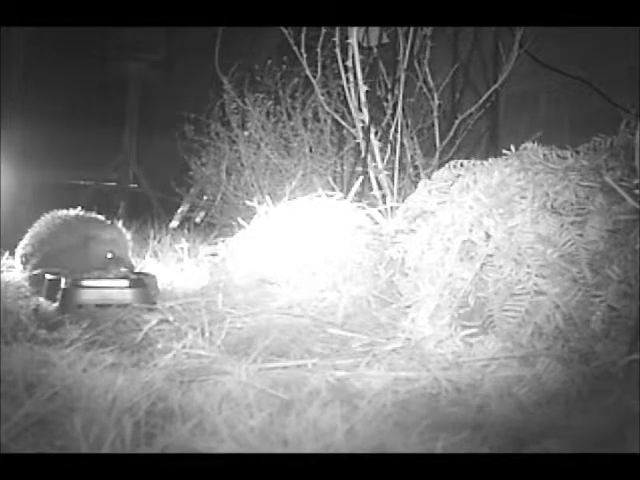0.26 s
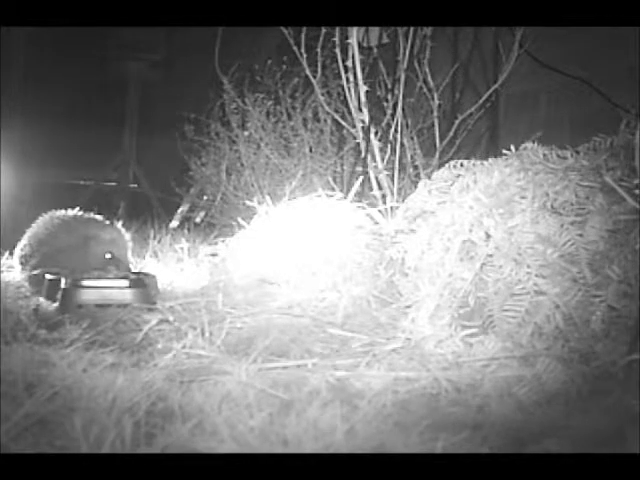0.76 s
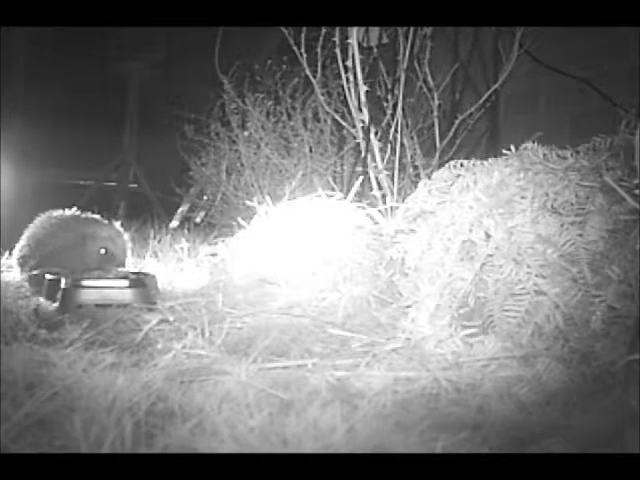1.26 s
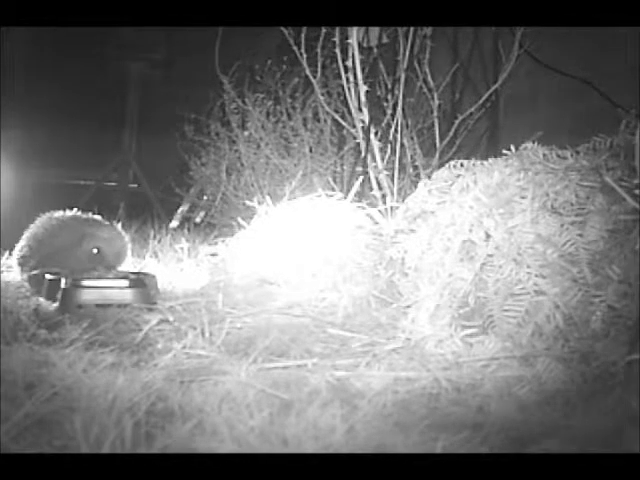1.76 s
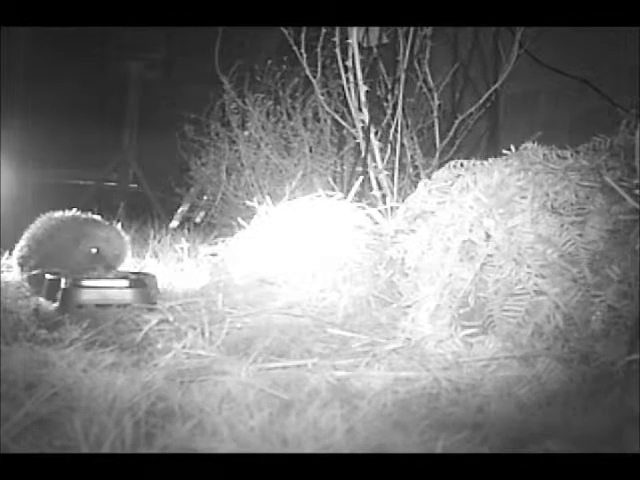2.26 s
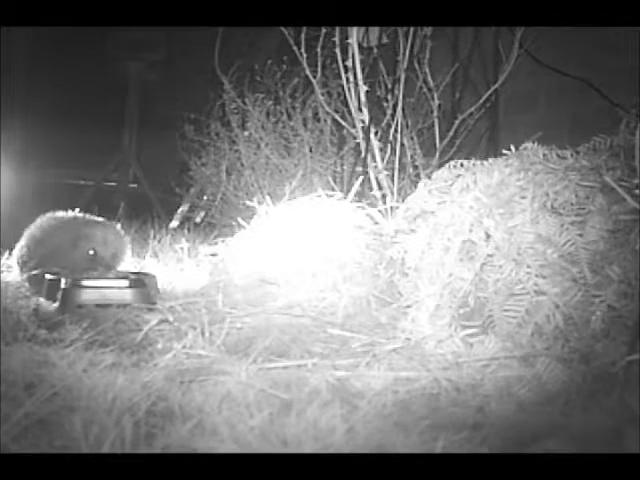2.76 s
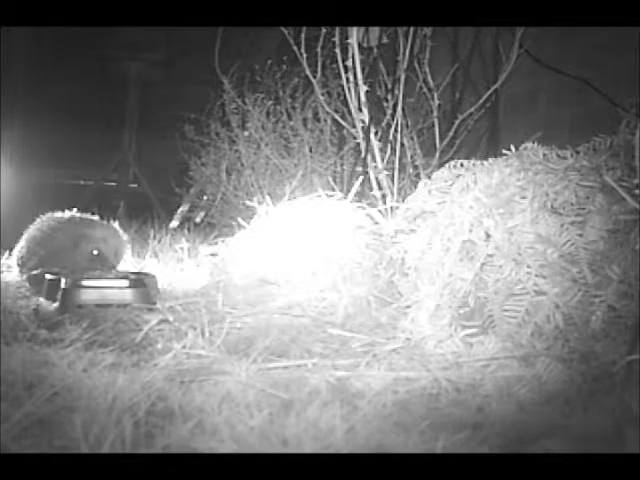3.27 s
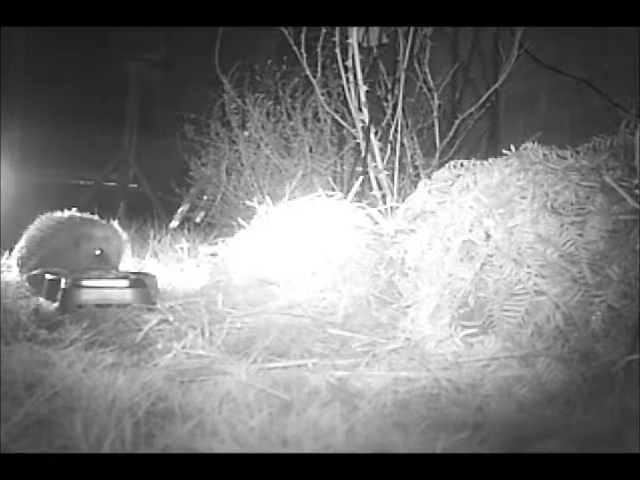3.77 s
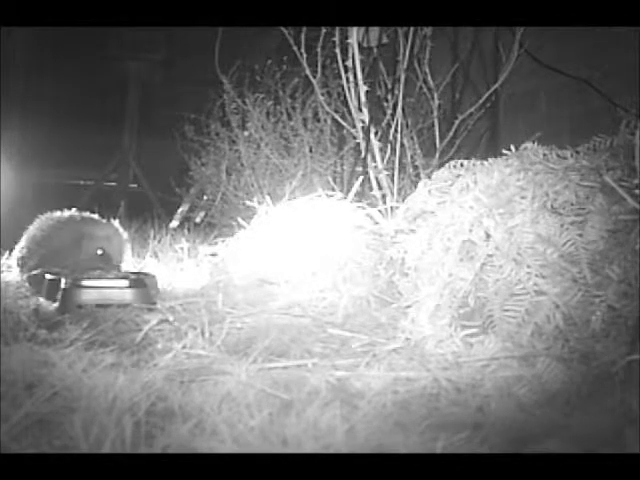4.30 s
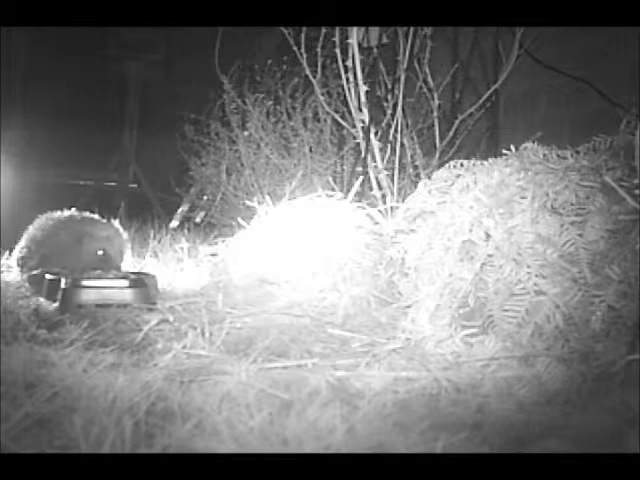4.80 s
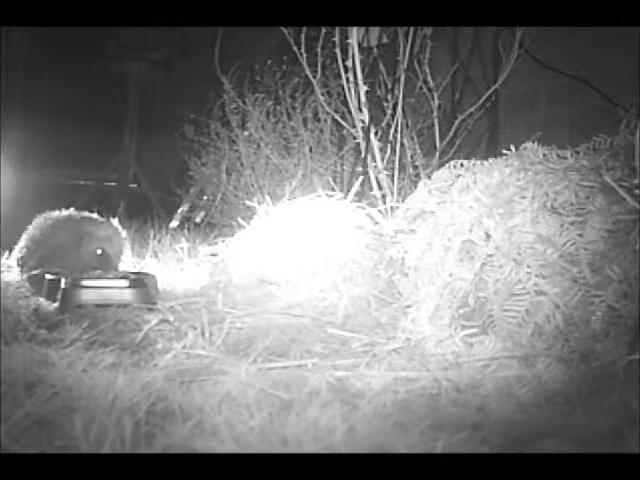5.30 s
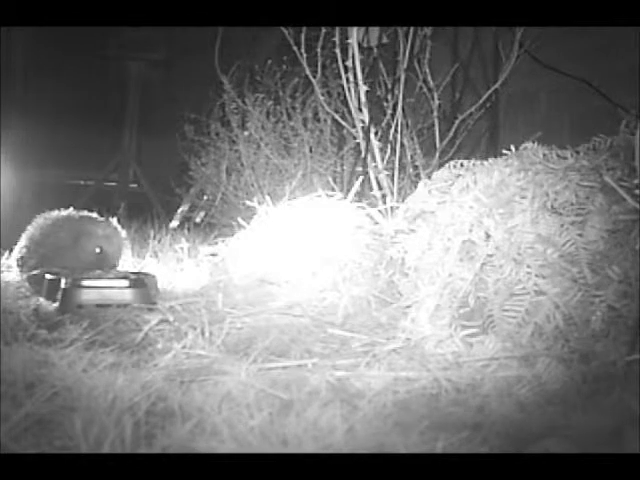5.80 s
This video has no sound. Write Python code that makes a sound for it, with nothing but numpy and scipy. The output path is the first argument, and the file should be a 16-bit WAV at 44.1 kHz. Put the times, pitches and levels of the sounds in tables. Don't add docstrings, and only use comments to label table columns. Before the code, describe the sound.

A quiet garden at night, heard through a small camera microphone a few steps from a feeding hedgehog. From 0 to 1.5 seconds single dry biscuit cracks come well spaced, with stronger crunches around 0.4 and 1.2. Until 2.4 there are mostly faint nips and wet lip clicks. At 2.5 to 2.75 a tight cluster breaks out, with the brightest, sharpest snap at 2.7. Chewing then continues in irregular little groups until about 5.5, shedding fine crumbly ticks, with small dish clinks near 3.7 and 3.95. Echoes are short and faint. Beneath are deep rumble, distant town noise and thin hiss. A low, wavering engine drone with soft tyre roar and whine draws closer, clearest after 4.2 and strongest from 5.6. Tiny electrical clicks fall at 3.4 and 5.45; dry stems tick and rustle around 5.4 to 5.7, and the hum continues to the end at 6.

```python
import sys
import numpy as np
from scipy import signal
from scipy.fft import rfft, irfft, next_fast_len
from scipy.io import wavfile
from scipy.ndimage import map_coordinates

SR = 44100
rng = np.random.default_rng(int(sys.argv[2]) if len(sys.argv) > 2 else 0)


def to_linear_factor(level_db):
    exponent = np.asarray(level_db, float) / 20
    return 10 ** exponent


def int16_out(signal):
    q = np.round(np.clip(np.atleast_2d(signal).T, -1, 1) * 32767)
    wavfile.write(sys.argv[1], SR, q.astype(np.int16))


N = 266756

# start in seconds, then crunch, jaw thud, chink and
# treble snap levels in dB.
HARD_CRACKS = [(0.0358, -53, -56.5, -74, -61), (0.4051, -42, -43.5, -56, -57.5),
               (0.7571, -51, -59, -62, -72), (1.2044, -48.5, -41.5, -52, -52), (1.5133, -53, -58, -57, -70),
               (2.503, -56, -62, -59, -70), (2.5162, -64, -57, -49.5, -67),
               (2.6224, -58, -46.5, -54, -46.5), (2.7017, -43, -41.5, -47, -39),
               (2.7208, -51, -44, -66, -49), (2.9643, -51, -61, -47, -63), (3.1667, -50, -70, -54.5, -63),
               (3.176, -54.5, -66, -61, -56.5), (3.449, -46, -53, -60, -61),
               (3.475, -50.5, -51.5, -59, -62), (3.7308, -53.5, -65, -51.5, -68),
               (3.9519, -47.5, -55, -53, -50), (3.961, -53, -57, -54, -60), (4.4586, -52.5, -67, -56, -57),
               (4.488, -47.5, -60, -57, -60), (4.713, -51.5, -63, -73, -58), (4.9646, -49, -65, -56, -66),
               (5.003, -47, -61, -69, -64), (5.431, -53, -56, -54, -62)]
# start in seconds, crunch level in dB, treble snap level in dB.
NIPS = [(0.2983, -65, -78), (0.4262, -62, -76), (1.1383, -64, -76), (1.1483, -60.5, -76), (1.23, -65, -64),
        (1.5068, -62, -65), (1.8107, -60.5, -70), (2.215, -57.5, -76), (2.5053, -64, -72),
        (2.5627, -65, -62), (2.9783, -61, -79), (2.9851, -61, -78), (3.2241, -64, -70),
        (3.2336, -55.5, -66), (3.2532, -58.5, -58.5), (3.2626, -66, -69), (3.4399, -65, -76),
        (3.465, -57, -74), (3.508, -62, -73), (3.7501, -63, -74), (3.929, -54.5, -71), (3.9552, -53, -65),
        (3.994, -59, -65), (4.503, -56, -66), (4.53, -58, -72), (4.6968, -57, -68), (4.703, -57, -65),
        (4.762, -57, -65), (4.9718, -58, -69), (5.465, -61, -70)]
# start in seconds, level in dB.
LIP_CLICKS = [(1.2991, -71), (1.349, -67), (1.631, -62.5), (1.7603, -69), (1.8022, -73), (1.9545, -70),
              (1.9893, -72), (2.0403, -69), (2.5057, -70), (2.288, -70), (3.734, -67), (2.7068, -62),
              (2.7113, -60), (2.7094, -60), (2.7298, -64), (2.7425, -67), (2.967, -65), (3.1424, -69),
              (3.321, -68), (3.4854, -66), (3.5035, -64), (3.8842, -68), (3.9683, -64), (4.4988, -67),
              (4.5999, -66), (4.6924, -68), (4.7543, -63), (4.9979, -64), (5.197, -69), (5.4515, -70)]
# time in seconds, jaw cavity, crunch and treble snap pitches in Hz.
MOUTH = [(0, 1450, 3320, 10600), (.4, 1800, 3000, 10600), (.76, 1650, 3300, 10600),
         (1.2, 2070, 2550, 10800), (1.5, 1950, 2916, 10900), (2.51, 1830, 3450, 10250),
         (2.63, 1950, 2700, 10640), (2.702, 1140, 3156, 9900), (2.72, 1840, 2670, 11090),
         (2.74, 1600, 3200, 9450), (2.96, 1600, 3237, 10650), (3.46, 1870, 2747, 11330),
         (3.96, 1670, 2888, 10850), (4.47, 2000, 2806, 10400), (4.7, 1692, 2850, 11230),
         (6.05, 1450, 2880, 10600)]
# frequency in Hz, level in dB, time to decay by 60 dB in seconds.
DISH_MODES = [
    (2870, 1, 0.023),
    (3130, 2.5, 0.018),
    (4050, 2, 0.006),
    (1600, -25, 0.014),
]
# start in seconds, ring level in dB.
DISH_KNOCKS = [
    (1.5053, -69),
    (3.7312, -53.5),
    (3.9545, -58),
    (4.6971, -67),
]
# delay in seconds, level in dB.
ECHOES = [
    (.0033, -16),
    (.0056, -20),
    (.0085, -37),
    (.012, -37),
]
# start in seconds, level in dB.
STEM_TICKS = [
    (5.557, -62),
    (5.6, -63),
]
# time in seconds, level in dB.
GRASS_STIR = [
    (0, -93),
    (5.38, -83.5),
    (5.45, -75),
    (5.5, -83),
    (5.57, -79),
    (5.66, -81.5),
    (5.85, -84),
    (6.05, -86),
]
# frequency in Hz, level in dB per Hz.
GRASS_COLOUR = [(3500, -26), (5000, -4), (9000, -3.5), (14500, -3), (15750, -23)]
# time in seconds, firing frequency in Hz, level in dB.
ENGINE = [(0.0, 58.1, -67), (0.25, 63.35, -67), (0.9, 60.1, -58.5), (1.25, 56.97, -64), (1.65, 58.37, -59),
          (1.88, 59.82, -59), (2.09, 59.83, -54.5), (2.5, 56.7, -63.5), (2.65, 58.66, -51),
          (3.0, 59.8, -53.5), (3.65, 59.5, -56.5), (3.92, 56, -64), (4.2, 57.55, -50), (4.42, 57.2, -54.5),
          (4.6, 57.2, -48.5), (5.61, 54.4, -41.5), (5.86, 54.92, -47), (6.05, 52.8, -41.5)]
# time in seconds, gain in dB.
APPROACH = [
    (0, -16),
    (1.45, -9.5),
    (2.54, -9.5),
    (2.9, -8.5),
    (4.13, 0),
    (6.05, 2.5),
]
# frequency in Hz, level in dB per Hz.
TYRE_COLOUR = [(130, -44), (250, -0.5), (500, -5), (700, -5), (1000, -1.5), (1300, -13), (2000, -10),
               (4000, -20.5)]
# frequency in Hz, level in dB per Hz.
WHINE_COLOUR = [(2400, -29.5), (2900, -6), (3050, -10), (3220, -2.5), (3380, -20), (3800, -42)]
# frequency in Hz, level in dB per Hz.
RUMBLE_COLOUR = [(7.1, -14.5), (12, 5), (24, 1), (65, -7.5), (86, -19.5), (108, -17), (140, -26),
                 (180, -46), (310, -120)]
# frequency in Hz, level in dB per Hz.
TOWN_COLOUR = [(41, -35.5), (70, -3), (86, -13), (123, -15), (148, -13), (232, -15.5), (350, -23.5),
               (391, -23), (689, -26.5), (1420, -31.5), (1710, -34.5), (2190, -36.5), (15700, -43.5)]
# frequency in Hz, level in dB.
CIRCUIT_TONES = [(13631, -94), (15625, -94.5), (15676, -100)]
# start in seconds, height in full-scale units.
GLITCHES = [
    (3.39032, -.004),
    (5.44529, .0098),
]

PITCH_SCATTER, SNAP_SCATTER = .04, .025
PHASE_SCATTER = .04
CHINK_HZ = 4010
NIP_THUD_DB, NIP_CHINK_DB = -2, -7
SECOND_S, SECOND_DB, SECOND_THUD_DB, SECOND_SNAP_DB = .0032, -21.5, -39, -30
RING_DB, RING_GROWS, MID_CRUNCH_DB = -75, 1, -65
WHINE_DB, TYRE_DB, TYRE_GROWS = -77, -68.5, .33
RUMBLE_DB, TOWN_DB = -57, -61
TOP_HZ = 15780
ABOVE_DB = -8


def unit(x):
    return x / np.sqrt(np.mean(x ** 2) + 1e-20)


def curves(rows):
    s, *cols = np.transpose(rows)
    return [np.interp(np.arange(N) / SR, s, c) for c in cols]


def wobble(rate):
    knots = rng.standard_normal(int(N * rate / SR) + 4)
    return map_coordinates(knots, [np.arange(N) * rate / SR])


def rush(spectrum):
    m = next_fast_len(N + SR // 2)
    hz = np.fft.rfftfreq(m, 1 / SR)
    f, db = np.transpose(spectrum)
    level_db = np.interp(np.log(hz + 1), np.log(f + 1), db, -120, -120)
    colour = to_linear_factor(level_db) * (hz < TOP_HZ)
    return unit(irfft(rfft(rng.standard_normal(m)) * colour, m)[:N])


def bursts(s, db, hz, rise, rough, size):
    t = np.arange(size) / SR
    u = t / rise[:, None]
    envelope = u * np.exp(1 - u)
    drift = rough * np.cumsum(rng.standard_normal((len(s), size)), axis=1)
    wave = to_linear_factor(db)[:, None] * envelope * np.sin(2 * np.pi * hz[:, None] * t + drift)
    at = np.round(s * SR).astype(int)[:, None] + np.arange(size)
    return np.bincount(at.ravel(), wave.ravel(), N + SR)[:N]


def fractures():
    hard = np.transpose(HARD_CRACKS)
    change = [[SECOND_S], [SECOND_DB], [SECOND_THUD_DB], [SECOND_DB], [SECOND_SNAP_DB]]
    second = hard + np.array(change)
    s, db, snap_db = np.transpose(NIPS)
    nips = [s, db, db + NIP_THUD_DB, db + NIP_CHINK_DB, snap_db]
    return np.hstack([hard, second, nips])


def snaps():
    s, *_, db = fractures()
    return np.hstack([[s, db], np.transpose(LIP_CLICKS)])


def cracks():
    at, jaw, middle, treble = np.transpose(MOUTH)
    s, crunch_db, thud_db, chink_db, _ = fractures()
    vary = np.exp(PITCH_SCATTER * rng.uniform(-1, 1, (len(s), 3))).T
    pitches = [np.interp(s, at, jaw), np.interp(s, at, middle), np.full(len(s), CHINK_HZ)]
    thud_hz, crunch_hz, chink_hz = vary * pitches
    thud = bursts(s, thud_db + 0.44, thud_hz, 0.7 / thud_hz, PHASE_SCATTER, size=300)
    crunch = bursts(s, crunch_db + 3.5, crunch_hz, 0.89 / crunch_hz, PHASE_SCATTER, size=200)
    chink = bursts(s, chink_db + 1.0, chink_hz, 1.27 / chink_hz, PHASE_SCATTER, size=140)
    s, snap_db = snaps()
    snap_hz = np.interp(s, at, treble) * np.exp(SNAP_SCATTER * rng.uniform(-1, 1, len(s)))
    snap = bursts(s, snap_db + 4.5, snap_hz, 3 / snap_hz, 2 * PHASE_SCATTER, size=160)
    front = bursts(s, snap_db - 3, .99 * snap_hz, 1.05 / snap_hz, PHASE_SCATTER, size=50)
    sizzle = bursts(s, snap_db - 27.5, .97 * snap_hz, 22 / snap_hz, 4 * PHASE_SCATTER, size=700)
    crumble = bursts(s, snap_db - 17, 0.41 * snap_hz, 30 / snap_hz, 12 * PHASE_SCATTER, size=1200)
    return thud + crunch + chink + snap + front + sizzle + crumble


def crumbs(parents_s, parents_db, hz, spread, base_db, cycles, count):
    s, db = np.repeat(parents_s, count), np.repeat(parents_db, count)
    luck = rng.random((len(s), 4))
    side = np.where(luck[:, 1] < .2, -1, 1)
    gap = -.014 * np.log(luck[:, 0]) * side
    when = np.clip(s + gap + .002 * np.sign(gap), 0, N / SR)
    pitch_hz = hz * np.exp(spread * (luck[:, 3] - .5))
    size_db = base_db + 0.32 * (db + 65) + 6 * luck[:, 2]
    return bursts(when, size_db, pitch_hz, cycles / pitch_hz, rough=0.099, size=160)


def dish():
    out, t = np.zeros(N + SR), np.arange(SR // 20) / SR
    when, crunch_db, *_ = fractures()
    rings_db = RING_DB + RING_GROWS * (crunch_db - MID_CRUNCH_DB)
    onset = 1 - np.exp(-t / 0.00031)
    for s, ring_db in [*zip(when, rings_db), *DISH_KNOCKS]:
        ring = np.zeros(len(t))
        for hz, db, t60 in DISH_MODES:
            decay = to_linear_factor(db + 4.2 * rng.uniform(-2.4, 1) - 60 * t / t60)
            ring += decay * np.sin(2 * np.pi * hz * rng.normal(1, 0.028) * t)
        start = round((s + .0028) * SR)
        out[start:][:len(t)] += to_linear_factor(ring_db - 4.5) * ring * onset
    return out[:N]


def garden(x):
    t = np.arange(SR // 12) / SR
    answer = to_linear_factor(-57 - 60 * t / 0.19) * rng.standard_normal(len(t)) * (t > .002)
    for s, db in ECHOES:
        smear = np.exp(-((t - s) / 0.000081) ** 2)
        answer += to_linear_factor(db - 7.0) * rng.standard_normal(len(t)) * smear
    return signal.fftconvolve(x, answer)[:N]


def grass():
    s, db = np.transpose(STEM_TICKS)
    ticks = bursts(s, db, np.full(len(s), 7000.), np.full(len(s), .00004), rough=.7, size=30)
    stir_db, = curves(GRASS_STIR)
    return ticks + to_linear_factor(stir_db + 3.9 * wobble(60)) * rush(GRASS_COLOUR)


def vehicle():
    hz, drone_db = curves(ENGINE)
    near_db, = curves(APPROACH)
    tyre_db, whine_db = TYRE_DB + TYRE_GROWS * near_db, WHINE_DB + near_db
    drone_level = np.sqrt(2) * to_linear_factor(drone_db + 0.92 * wobble(5.7) + 1.8 * wobble(22))
    phase = 2 * np.pi * np.cumsum(hz) / SR + 0.27 * wobble(8.2)
    drone = drone_level * np.sin(phase)
    tyres = to_linear_factor(tyre_db - 1.5 + 0.39 * wobble(3.6)) * rush(TYRE_COLOUR)
    whine = to_linear_factor(whine_db - 2 + 1.2 * wobble(11)) * rush(WHINE_COLOUR)
    return drone + tyres + whine


def night():
    t = np.arange(N) / SR
    rumble = to_linear_factor(RUMBLE_DB + 6.0 + 1.6 * wobble(5.3) + 1.1 * wobble(1.5)) * rush(RUMBLE_COLOUR)
    town = to_linear_factor(TOWN_DB - 1.5 + 0.32 * wobble(2.8)) * rush(TOWN_COLOUR)
    tones = np.zeros(N)
    for hz, db in CIRCUIT_TONES:
        level = np.sqrt(2) * to_linear_factor(db + 1.5 * wobble(9))
        tones += level * np.sin(2 * np.pi * hz * t + 1.1 * wobble(14))
    return rumble + town + tones


def glitches():
    out = np.zeros(N)
    for s, height in GLITCHES:
        out[round(s * SR):][:8] = height
    return out


def scene():
    low, high = fractures(), snaps()
    chew = cracks()
    chew = chew + crumbs(low[0], low[1], hz=3520, spread=.4, base_db=-68.5, cycles=0.52, count=5)
    chew = chew + crumbs(high[0], high[1], hz=10600, spread=0.21, base_db=-74.0, cycles=2.9, count=3)
    mix = chew + dish() + garden(chew) + grass() + vehicle() + night() + glitches()
    return mix[None]


def top_cut(x):
    return signal.sosfilt(signal.butter(12, 16460, fs=SR, output="sos"), x)


def record(dry):
    m = next_fast_len(N + SR // 10)
    hz = np.fft.rfftfreq(m, 1 / SR)
    gain = np.where(hz > TOP_HZ, to_linear_factor(ABOVE_DB) * (hz < 1.04 * TOP_HZ), 1)
    limited = irfft(rfft(dry, m) * gain, m)[:, :N]
    return top_cut(limited)


dry = scene()
out = record(dry)
int16_out(out)
```